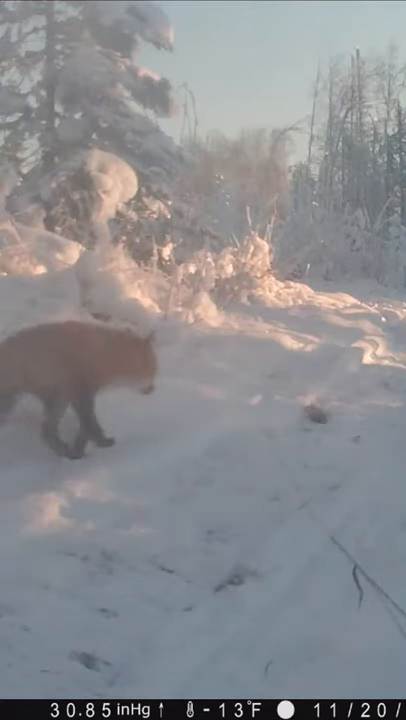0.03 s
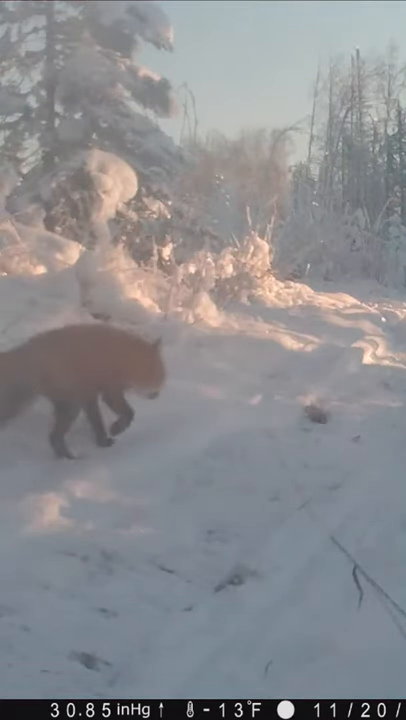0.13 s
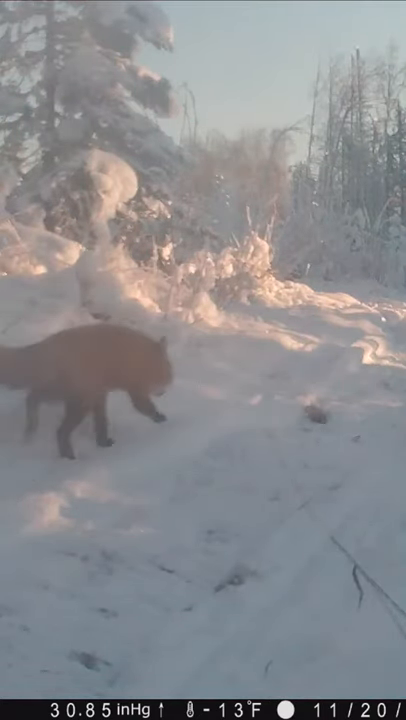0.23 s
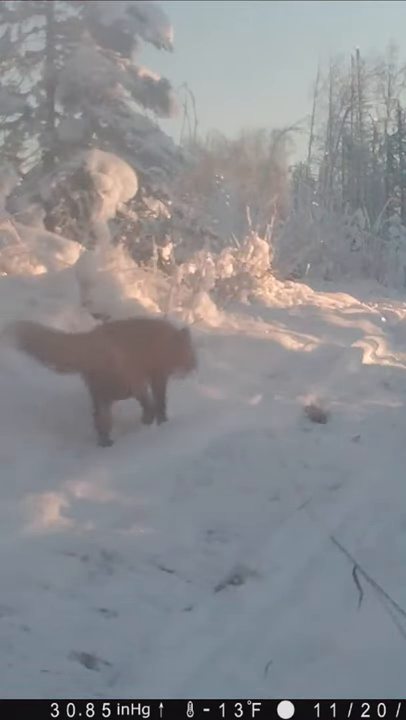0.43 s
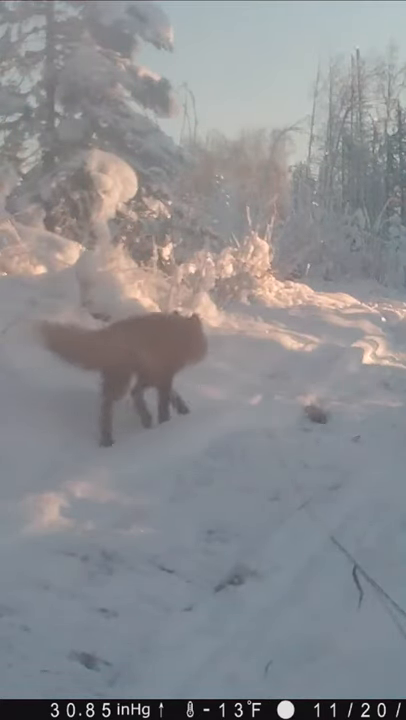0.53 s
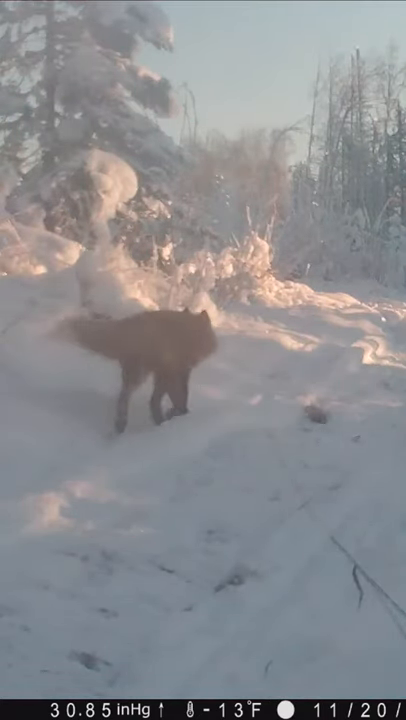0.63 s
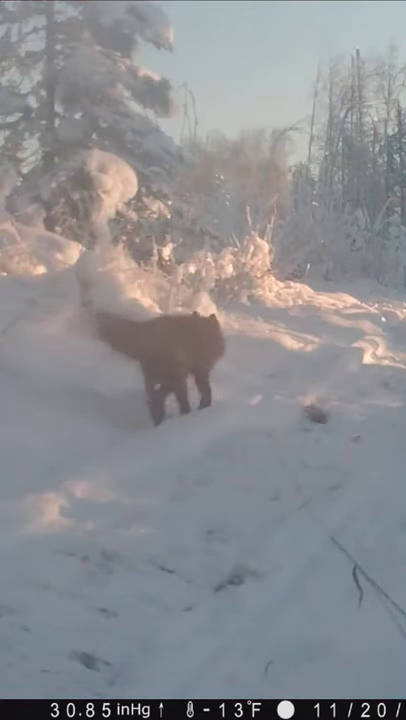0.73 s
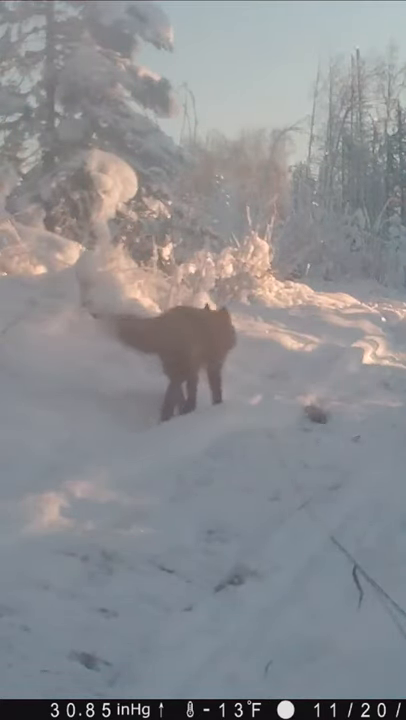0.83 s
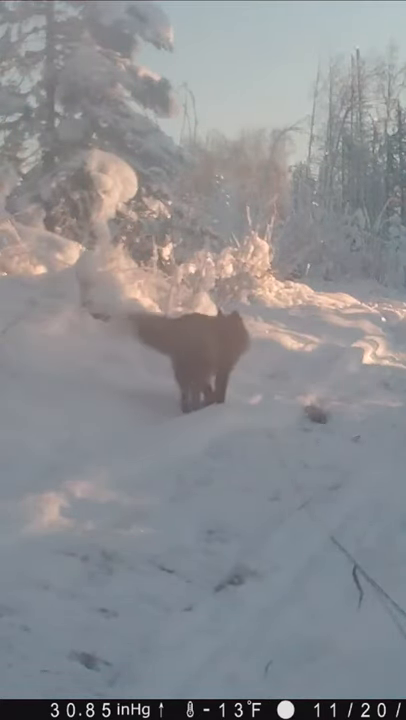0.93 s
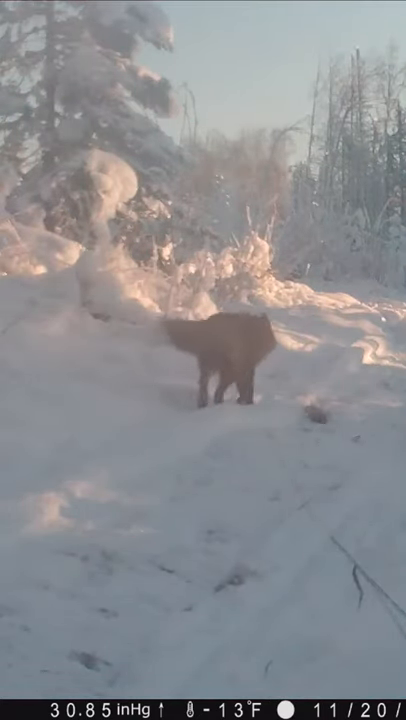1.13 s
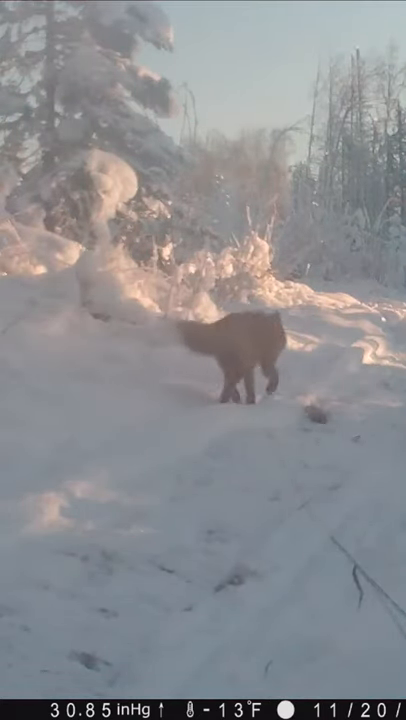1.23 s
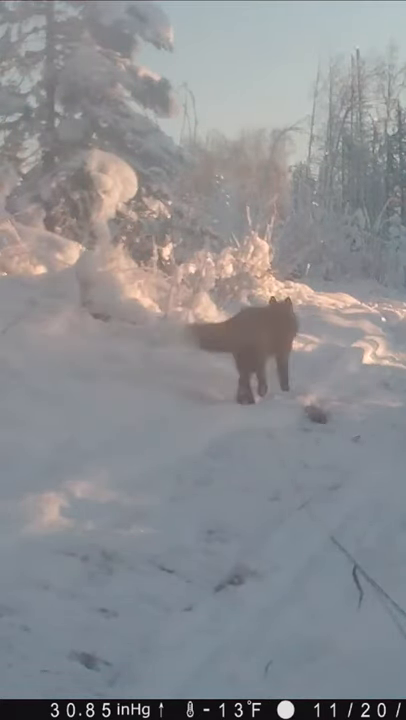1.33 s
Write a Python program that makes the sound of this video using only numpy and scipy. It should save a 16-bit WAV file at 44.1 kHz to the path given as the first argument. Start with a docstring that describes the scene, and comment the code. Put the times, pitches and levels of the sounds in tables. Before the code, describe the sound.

Two loud, rasping raven caws come in quick succession, the second slightly shorter, distorting the microphone a little at their peaks. They echo softly in still woods, with a faint hush of air and a high, steady whine behind.

```python
"""A raven caws twice in still, snowy woodland, heard by a trail camera that distorts on loud peaks.
A pulsing membrane in its throat makes the tone, and rushing breath adds a rasp. Each caw starts as
a rattle of separate bursts, opens into a tone whose pitch flutters ever more slowly, and ends in a
smooth fall. Trees return a soft echo over faint air noise and the camera's thin electronic whine."""
import sys
import numpy as np
from scipy import signal
from scipy.fft import rfft, irfft, next_fast_len
from scipy.io import wavfile

SR = 44100
rng = np.random.default_rng(int(sys.argv[2]) if len(sys.argv) > 2 else 0)


def wav_out(sig):
    """Save sig, one row per channel (or a flat mono array), as 16-bit PCM at SR to the path in sys.argv[1]."""
    wavfile.write(sys.argv[1], SR, np.round(np.clip(np.atleast_2d(sig).T, -1, 1) * 32767).astype(np.int16))


N = 61739


def amp(db):
    """Turn decibels into a number to multiply by."""
    return 10 ** (np.asarray(db) / 20)


def unit(x):
    """Scale a signal to an average (rms) level of 1."""
    return x / np.sqrt(np.mean(x ** 2) + 1e-18)


def curve(t, rows):
    """Join (seconds, value) rows with straight lines."""
    return np.interp(t, *np.array(rows).T)


def colour(x, points):
    """Turn the lows and highs of a sound up or down along (Hz, dB) points."""
    size = next_fast_len(2 * len(x), True) // 2 * 2
    hz, db = np.array(points).T
    freqs = np.maximum(np.arange(size // 2 + 1) * SR / size, 1)
    cepstrum = irfft(np.log(amp(np.interp(np.log(freqs), np.log(hz), db))))
    # this fold makes the filter ring only after a sound, never before it
    cepstrum[1:size // 2] *= 2
    cepstrum[size // 2 + 1:] = 0
    return irfft(rfft(x, size) * np.exp(rfft(cepstrum)))[:len(x)]


def wander(hz):
    """A smooth random wobble of size about 1; a higher hz makes it quicker."""
    return unit(signal.sosfilt(signal.butter(2, hz, fs=SR, output="sos"), rng.standard_normal(N)))


# The tone of the still air. Each row: frequency in Hz, level in dB.
AIR_COLOUR = [(18, -74.5), (30, -54), (81, -18.5), (253, -17.5), (288, -10), (328, -16), (460, -11.5),
              (581, -13.5), (6360, -40), (7630, -36.5), (8250, -34.5), (15000, -59.5)]
AIR_DB, WHINE_HZ, WHINE_DB = -60.5, 7884, -65


def air_and_whine(t):
    """Faint air noise and the steady high note of the camera's electronics."""
    air = amp(AIR_DB) * unit(colour(rng.standard_normal(N), AIR_COLOUR))
    whine = amp(WHINE_DB) * unit(np.sin(2 * np.pi * WHINE_HZ * t))
    return air + whine


# The two caws. Each row: first burst in seconds, end in seconds, slowing of the flutter in seconds
# per square root of a second, time the flutter dies away in seconds, lag of the pitch behind each
# burst in cycles, roughness from 0 to 1, boost at 1600 Hz in dB, boost from 7000 Hz up in dB.
CAWS = [(.192, 0.521, .024, .459, 0.21, .5, 3, -1), (.904, 1.165, .027, 1.116, 0.099, 0.4, -0.5, -12)]
# The rise and fall of the voice, one list per caw. Each row: time in seconds, pitch in Hz.
CAW_PITCH = [
    [(.18, 442.1), (.22, 510.4), (.25, 554.6), (.30, 593.4), (.36, 567.6), (.42, 581.2), (.455, 526.3),
     (.478, 501.3), (.486, 423), (.502, 397.2), (.52, 289.6)],
    [(.90, 453.1), (.95, 505.5), (1.0, 555.2), (1.06, 564.1), (1.10, 509), (1.124, 498.3), (1.137, 408.5),
     (1.155, 328.3), (1.175, 255)],
]
# How hard the bird pushes, one list per caw. Each row: time in seconds, effort in dB.
CAW_EFFORT = [
    [(.182, -30.5), (.192, -20), (.205, -27), (.218, -23), (.232, -6.5), (.28, -3.5), (.335, -3.5),
     (.36, -3.5), (.44, -2.5), (.47, -9), (.495, -17), (.509, -14), (.527, -40.5)],
    [(.896, -46.5), (.903, -15.5), (.93, -10.5), (.965, -8.5), (1.0, -4), (1.06, -3.5), (1.10, -6),
     (1.135, -12.5), (1.152, -22.5), (1.175, -42.5)],
]
# The beak, one list per caw. Each row: time in seconds, opening from 0 (shut) to 1 (wide).
BEAK_OPENING = [
    [(.182, 0.13), (.20, 0.31), (.212, 0.25), (.216, 0.74), (.25, 0.82), (.47, 0.88), (.495, 1),
     (.508, .45), (.525, 0)],
    [(.899, 0.05), (.902, 0.49), (.93, 0.72), (.96, 0.85), (1.12, 0.83), (1.14, 0.83), (1.152, 0.2),
     (1.175, 0.23)],
]
FLUTTER_PERIOD_S, FLUTTER_DEPTH, FLUTTER_FADE_S = .0103, .105, .015
RATTLE_S, BREAK_S, JITTER, JITTER_HZ = .082, .03, .055, 680


def caw(t, row, pitch, effort, beak):
    """One caw: a slowing flutter chops the voice and breath into bursts and bends the pitch."""
    start, end, slowing, smooth_at, lag, roughness, mid_db, treble_db = row
    age = np.maximum(t - start, 0)
    cycles = np.cumsum(1 / (FLUTTER_PERIOD_S + slowing * np.sqrt(age))) / SR
    cycles -= np.interp(start, t, cycles)
    flutter = np.clip((smooth_at - t) / FLUTTER_FADE_S + .5, 0, 1)
    opening = np.clip(curve(t, beak), 0, 1)
    fades = np.clip((t - effort[0][0]) / .002, 0, 1) * np.clip((end - t) / .005, 0, 1)
    push = amp(curve(t, effort)) * fades
    # gaps between the bursts: deep and wide at first, shallow later
    burst = np.abs(np.cos(np.pi * cycles))
    early = np.exp(-(age / RATTLE_S) ** 2)
    gap = flutter * (1 - burst ** 1.26)
    rattle = early * (1 - burst ** 5.6)
    slack = flutter * (1 - early) * np.sin(np.pi * (cycles - lag)) ** 2  # overtones fade as pitch dips
    core_chop = amp(-opening * (10 * gap ** 1.6 + 12.5 * rattle))
    upper_chop = amp(-6 * slack - 17 * rattle)
    # the voice is rough in the gaps and first bursts, and cracks as the breath runs out
    crack = .57 * np.exp(-((t - end) / BREAK_S) ** 2)
    rough = crack + roughness * (.17 + 1.6 * gap ** 2 + 2.58 * opening * early)
    bend = FLUTTER_DEPTH * flutter * np.cos(2 * np.pi * (cycles - lag))
    hz = curve(t, pitch) * (1 + bend + JITTER * rough * wander(JITTER_HZ))
    phase = 2 * np.pi * np.cumsum(hz) / SR
    tone = throat(push * membrane(phase, rough, core_chop, upper_chop), opening)
    puffs = opening * upper_chop * (1 + .8 * np.cos(phase))  # one puff of air per membrane pulse
    voice_with_distortion = tone + rasp(puffs, push, rough) + camera_distortion(puffs, push, gap)
    brightness = [(1200, .038), (1600, mid_db), (2900, treble_db / 10),
                  (4500, treble_db / 3), (7000, treble_db)]
    return colour(voice_with_distortion, brightness)


def membrane(phase, rough, core_chop, upper_chop):
    """The pulsing membrane buzzes: a clear core of two low tones, with frayed overtones above."""
    core = (np.cos(phase) + np.cos(2 * phase)) * (1 + .74 * rough * wander(350))
    smear, fray = .22, .24  # smear spreads each pulse out; fray makes higher overtones drift more
    upper = sum(np.cos(k * phase - smear * k * k + fray * k * rough * wander(148)) for k in range(3, 20))
    shimmer = 1 + .89 * rough * wander(300)
    return core * core_chop + upper * upper_chop * shimmer


# The tone of the throat with the beak open. Each row: frequency in Hz, level in dB.
OPEN_THROAT = [(60, -50.5), (150, -45.5), (300, -16), (480, -10.5), (620, -17), (760, -14.5), (920, 1.5),
               (1130, 0.5), (1300, -0.5), (1550, -8), (1850, -17), (2300, -25), (2850, -12), (3300, -18.5),
               (3900, -13.5), (4900, -18.5), (5800, -16.5), (6800, -32.5), (7800, -39), (9000, -38),
               (15000, -39.5)]
# The tone of the throat with the beak shut. Each row: frequency in Hz, level in dB.
SHUT_THROAT = [(120, -31), (260, -3.5), (450, -12), (620, -11.5), (860, 7), (1050, 1.5), (1400, -4.5),
               (2000, -35.5), (5000, -48), (9000, -68.5)]


def throat(buzz, opening):
    """The throat and beak shape the buzz: bright when open, muffled when shut."""
    return 2 * amp(-7) * (colour(buzz * opening, OPEN_THROAT) + colour(buzz * (1 - opening), SHUT_THROAT))


# The tone of the rushing breath. Each row: frequency in Hz, level in dB.
RASP_COLOUR = [(25, -55.5), (80, -29.5), (200, -26.5), (450, -1.5), (750, -18.5), (1100, -2.5), (1600, -6),
               (2200, -8), (2900, -3), (4200, -1), (5000, -27.5), (6000, -4), (7000, -8), (7900, -39.5),
               (10000, -47), (15000, -55.5)]


def rasp(puffs, push, rough):
    """Air rushes through the throat in puffs, louder where the voice is rough."""
    breath = rng.standard_normal(N) * puffs * push * (.5 + rough)
    return 2 * amp(-11.5) * colour(breath, RASP_COLOUR)


# The tone of the camera's distortion. Each row: frequency in Hz, level in dB.
DISTORTION_COLOUR = [(25, -15), (60, 2.5), (200, 6.5), (500, 4.5), (7700, -29.5), (8600, 2), (11000, 1),
                     (15500, -6)]


def camera_distortion(puffs, push, gap):
    """The camera's distortion adds a high sizzle and low rumble on the loudest peaks."""
    snaps_db = 2.5 * wander(222)
    strength = puffs * push ** 2.12 * amp(-18.5 - 4 * gap + snaps_db)
    return colour(rng.standard_normal(N) * strength, DISTORTION_COLOUR)


# The tone that nearby trees send back. Each row: frequency in Hz, level in dB.
NEAR_TREES = [(100, 6.5), (500, 1), (1100, 2), (2000, -2.5), (4000, -2), (7000, -2), (14000, -32.5)]
# The tone that the forest edge sends back. Each row: frequency in Hz, level in dB.
FAR_TREES = [(100, -2), (500, -5.5), (850, 0), (1150, 3.5), (1500, 0), (2100, -8), (2550, -8.5), (2800, 0),
             (3100, -9.5), (4200, -4), (7000, -15.5), (14000, -8)]
NEAR_FADE_S, ECHO_DELAY_S, ECHO_SPREAD_S = .27, .22, .052


def woods(x, t):
    """Sound bounces back: a short scatter from the trees and a soft echo from the forest edge."""
    near = unit(rng.standard_normal(N) * amp(-60 * t / NEAR_FADE_S) * np.clip(t / .004, 0, 1))
    far = unit(rng.standard_normal(N) * np.exp(-np.abs(t - ECHO_DELAY_S) / ECHO_SPREAD_S))
    echoes = (amp(-12) * colour(near, NEAR_TREES) + amp(-35) * colour(far, FAR_TREES)) / np.sqrt(N)
    return x + signal.fftconvolve(x, echoes)[:N]


def scene():
    """Two caws among the trees, over faint air and whine."""
    t = np.arange(N) / SR
    caws = sum(caw(t, *parts) for parts in zip(CAWS, CAW_PITCH, CAW_EFFORT, BEAK_OPENING))
    return (woods(caws, t) + air_and_whine(t))[None]


HEADROOM, LOW_CUT_HZ, HIGH_CUT_HZ = .97, 82, 15550


def record(dry):
    """The camera rounds off the loudest peaks and cuts the lowest bass and highest treble."""
    rounded = HEADROOM * np.tanh(dry / HEADROOM)
    thinned = signal.sosfilt(signal.butter(2, LOW_CUT_HZ, "high", fs=SR, output="sos"), rounded)
    return signal.sosfilt(signal.ellip(10, .2, 80, HIGH_CUT_HZ, fs=SR, output="sos"), thinned)


dry = scene()
out = record(dry)
wav_out(out)
```